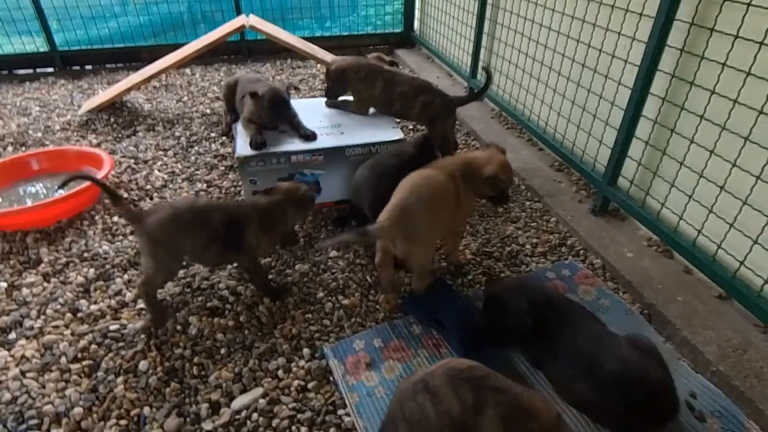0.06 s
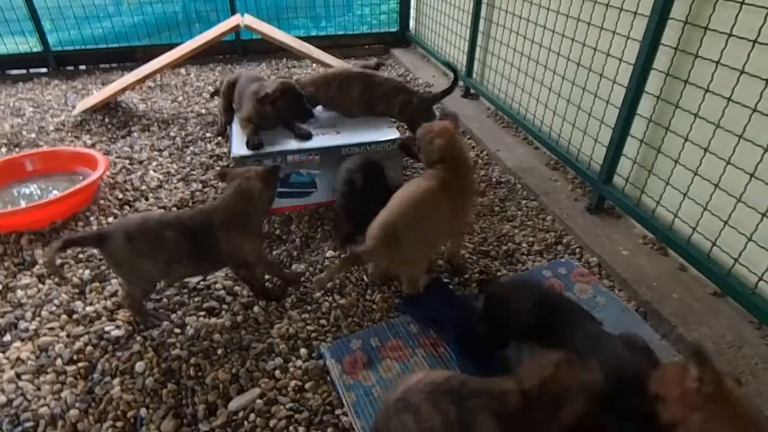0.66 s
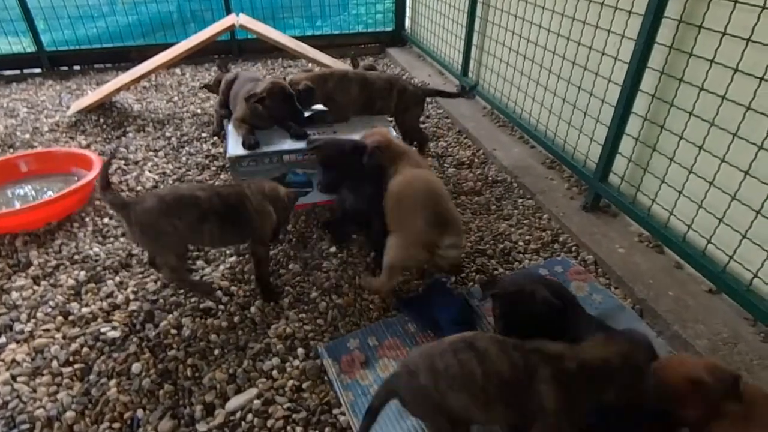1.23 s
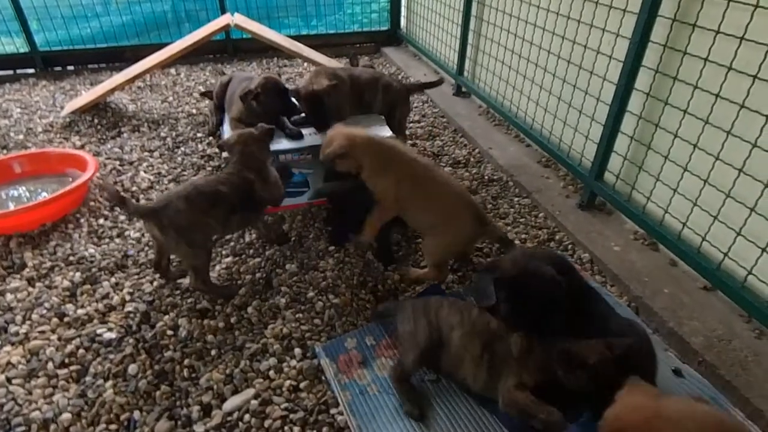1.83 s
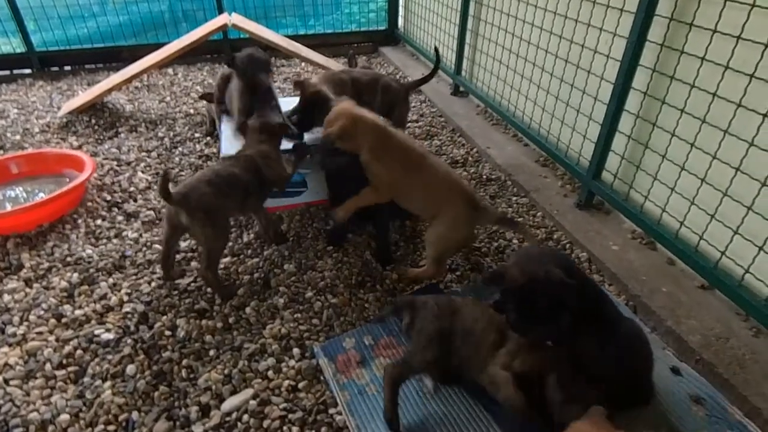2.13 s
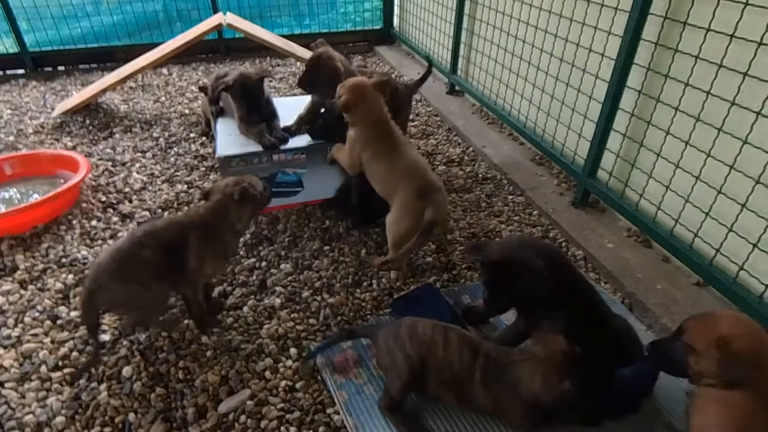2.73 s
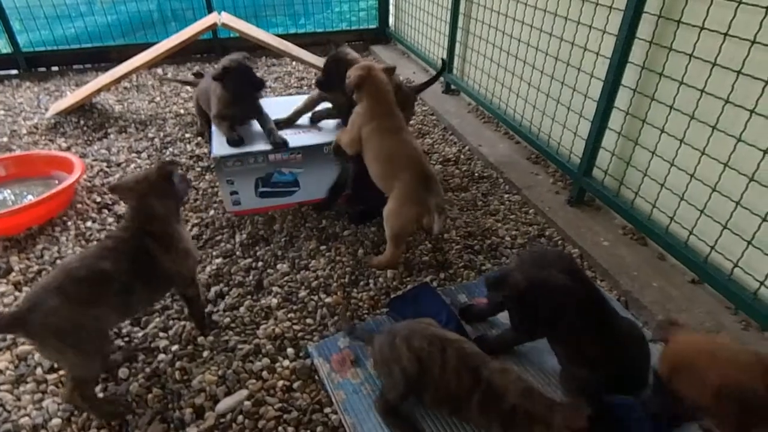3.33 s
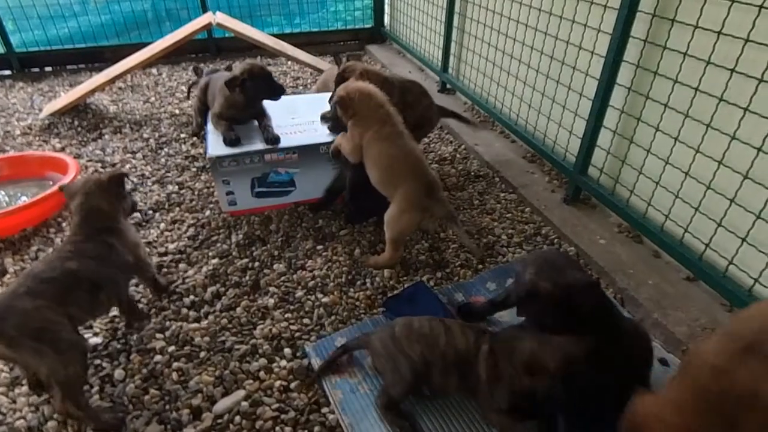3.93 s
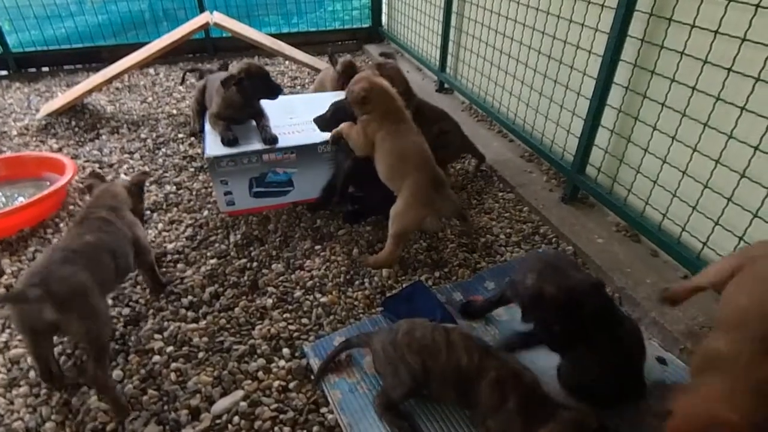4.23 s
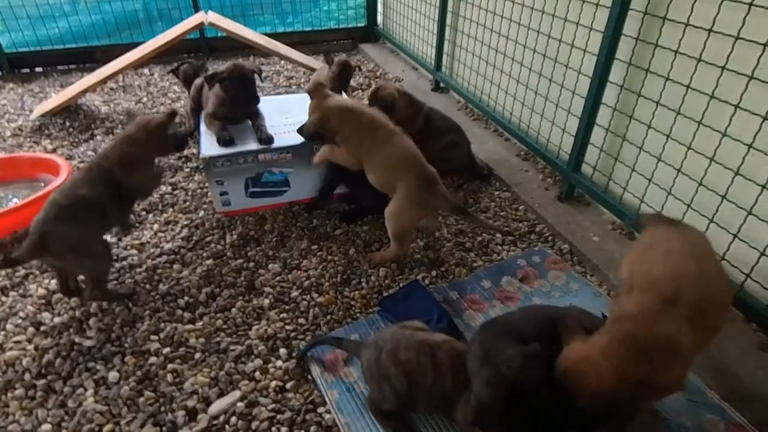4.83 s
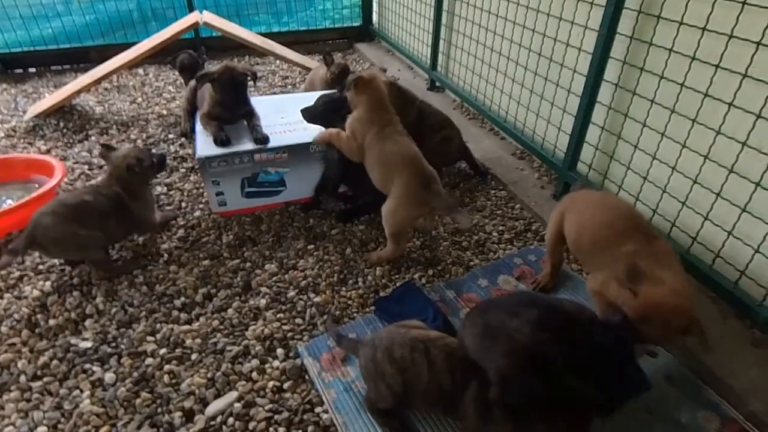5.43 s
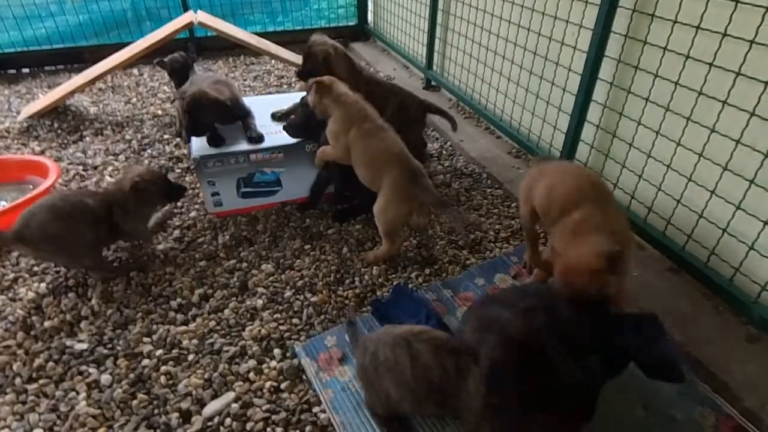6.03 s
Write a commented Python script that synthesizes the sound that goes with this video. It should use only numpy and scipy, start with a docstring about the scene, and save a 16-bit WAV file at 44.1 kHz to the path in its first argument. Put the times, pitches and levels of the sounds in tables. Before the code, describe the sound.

A puppy growls in long rough strokes with a few sharp yips, while paws thump a cardboard box and shuffle gravel.

```python
"""Puppies squabbling over a cardboard box

In a roofed gravel pen, one puppy growls in long rough strokes that open into sharp, snarling yips:
uneven vocal-fold pulses and breath noise drive throat, mouth and teeth resonances.
Paws thump the hollow box and shuffle the pebbles, over a low rumble and quiet outdoor air.
The pen answers briefly; the sound is close and nearly mono."""
import sys
import numpy as np
from scipy import signal
from scipy.fft import rfft, irfft, next_fast_len
from scipy.io import wavfile
from scipy.ndimage import uniform_filter1d, map_coordinates

SR = 44100
rng = np.random.default_rng(int(sys.argv[2]) if len(sys.argv) > 2 else 0)


def inscribe(sig):
    """Save sig as 16-bit PCM at rate SR to the path in sys.argv[1].

    A 1-D sig is mono; a 2-D sig holds one channel per row.
    Samples are clipped to [-1, 1] before scaling.
    """
    pcm = np.round(np.clip(np.atleast_2d(sig).T, -1, 1) * 32767)
    wavfile.write(sys.argv[1], SR, pcm.astype(np.int16))


N = 267731
TIME = np.arange(N) / SR


def amp(db):
    """Decibels to gain."""
    return 10 ** (np.asarray(db) / 20)


def unit(x):
    """Scale to rms 1."""
    return x / np.sqrt(np.mean(x ** 2) + 1e-20)


def along(points, hz):
    """Read (frequency [Hz], value) points on a log axis."""
    point_hz, values = np.transpose(points)
    return np.interp(np.log(hz + 1), np.log(point_hz), values)


def wobble(rate_hz):
    """Smooth random curve, rate_hz knots a second."""
    coarse_s = TIME[::2 ** 5]
    knots = rng.standard_normal(2 ** 12)
    return np.interp(TIME, coarse_s, map_coordinates(knots, [coarse_s * rate_hz], mode="mirror"))


def coloured(x, gain):
    """Minimum-phase filter with magnitude gain(hz)."""
    size = 2 ** 13
    magnitude = np.maximum(gain(np.fft.rfftfreq(size, 1 / SR)), 1e-6)
    cepstrum = irfft(np.log(magnitude), size)
    cepstrum[1:size // 2] *= 2
    cepstrum[size // 2 + 1:] = 0
    return signal.oaconvolve(x, irfft(np.exp(rfft(cepstrum)), size))[:N]


def equalised(x, points):
    """Filter by (frequency [Hz], gain [dB]) points."""
    return coloured(x, lambda hz: amp(along(points, hz)))


def steady(x, window_samples):
    """Even out slow swells, leaving rms near 1."""
    power = uniform_filter1d(uniform_filter1d(x ** 2, window_samples), window_samples)
    return x / np.sqrt(np.abs(power) + 1e-12)


def add(track, time_s, sound):
    """Mix a sound in at time_s."""
    start = max(round(time_s * SR), 0)
    track[start:start + len(sound)] += sound[:max(N - start, 0)]


def pen(x, wet_db):
    """Direct sound, quick scatter off box, bodies and stones, and the walls' tail; power preserved."""
    # (frequency [Hz], t60 [s])
    wall_decay = [(100, 0.76), (500, 0.71), (2000, 0.84), (8000, 0.024)]
    hz, t, noise = signal.stft(rng.standard_normal(SR // 4), SR, nperseg=256)
    scatter = amp(-60 * t / .075)
    walls = amp(-10 - 60 * t / along(wall_decay, hz)[:, None])
    tail = signal.istft(noise * (scatter + walls), SR, nperseg=256)[1]
    tail = np.pad(tail / np.linalg.norm(tail), (SR // 600, 0))
    return (x + amp(wet_db) * signal.oaconvolve(x, tail)[:N]) / np.hypot(1, amp(wet_db))


def background():
    """Uneven low rumble and quiet outdoor air."""
    # rumble contour: (time [s], level [dB])
    rumble_levels = [(0.0, -43.5), (1.45, -43), (1.96, -44), (2.4, -39.5), (3.75, -40.5), (4.01, -42),
                     (6.07, -40)]
    # (frequency [Hz], relative level [dB])
    rumble_spectrum = [(15, -16), (30, -9), (45, 3.5), (70, -2), (140, -2), (220, -12), (500, -31),
                       (1200, -82)]
    # (frequency [Hz], relative level [dB])
    air_spectrum = [(30, -34.5), (150, 1.5), (450, 2), (800, -5), (1500, -14), (3000, -21), (9000, -22.5)]
    swell_db = np.interp(TIME, *np.transpose(rumble_levels)) + 2.16 * wobble(14) - 0.5
    rumble = unit(equalised(rng.standard_normal(N), rumble_spectrum))
    rumble = steady(rumble, window_samples=5000) * amp(swell_db)
    air = unit(equalised(rng.standard_normal(N), air_spectrum))
    return rumble + air * amp(-49.5 + 0.38 * wobble(7.9))


def pebbles(rate_hz, spread_db):
    """Dense patter of stone contacts of unequal size, each ringing for a few cycles."""
    count = int(rate_hz * N / SR)
    t = np.arange(SR // 250) / SR
    when, tone, rank = rng.random((count, 3)).T[:, :, None]
    ring_hz = 2500 + 6500 * tone
    size = amp(-spread_db * np.log(rank + 0.037))
    grains = size * np.sin(2 * np.pi * ring_hz * t) * np.exp(-t * ring_hz / 4.6)
    indices = (when * N).astype(int) + np.arange(len(t))
    return unit(np.bincount(indices.ravel(), grains.ravel(), N)[:N])


def shoves():
    """Envelope of pebble motion: each step builds and settles, over a faint stirring."""
    # paw steps: (hardest push [s], level [dB], settling time [s])
    steps = [(.12, -43.5, 0.044), (0.224, -29, 0.027), (0.311, -35, 0.1), (0.618, -42.5, 0.048),
             (.87, -39, 0.18), (1.048, -40.5, 0.032), (1.128, -36, 0.018), (1.21, -33.5, 0.015),
             (1.377, -34.5, 0.1), (1.56, -39.5, 0.12), (1.782, -40.5, 0.031), (1.938, -48, 0.015),
             (2.069, -45.5, 0.021), (2.159, -40.5, 0.054), (2.32, -39.5, 0.11), (2.478, -40.5, 0.099),
             (2.61, -40, 0.013), (2.7, -35, 0.18), (2.901, -32, 0.1), (3.131, -32, 0.032),
             (3.239, -34, 0.046), (3.448, -43, 0.041), (3.575, -40.5, 0.031), (3.652, -41.5, 0.028),
             (3.771, -39, 0.013), (4.0, -39, 0.029), (4.09, -39.5, 0.021), (4.168, -36, 0.032),
             (4.312, -35, 0.03), (4.389, -37, 0.092), (4.481, -46.5, 0.09), (4.652, -36, 0.057),
             (4.85, -35.5, 0.025), (4.91, -35, 0.043), (5.269, -33, 0.055), (5.42, -41.5, 0.028),
             (5.578, -40.5, 0.038), (5.678, -41.5, 0.037), (5.759, -45.5, 0.01)]
    stir_db, rise_share = -64, 0.8
    power = np.full(N, amp(stir_db) ** 2)
    for time_s, db, settle_s in steps:
        start, end = np.searchsorted(TIME, [time_s - 10 * settle_s, time_s + 10 * settle_s])
        t = TIME[start:end] - time_s
        from_peak = np.maximum(t, -t / rise_share) / settle_s
        power[start:end] += amp(db) ** 2 * np.exp(-2 * from_peak ** 1.04)
    return np.sqrt(power)


def clacks():
    """Kicked pebbles strike together and settle: noise bursts with a fast and a slow decay."""
    # (time [s], level [dB])
    kicks = [(0.1573, -34.5), (0.868, -24), (0.9122, -23.5), (1.175, -29.5), (1.6574, -28), (1.7225, -32.5),
             (1.854, -41.5), (3.1343, -12.5), (3.5636, -25), (4.2426, -33.5), (4.375, -22.5),
             (4.4489, -25.5), (4.827, -30), (5.0736, -38), (5.1361, -32.5), (5.223, -23.5), (5.5014, -39)]
    # (frequency [Hz], gain [dB])
    clack_colour = [(300, 0.5), (1500, -11), (3000, -8), (5000, 3), (9000, 3)]
    out, t = np.zeros(N), np.arange(SR // 10) / SR
    strike = (amp(-60 * t / .025) + amp(-8 - 60 * t / .12)) * (1 - np.exp(-t / .0012))
    for time_s, db in kicks:
        add(out, time_s, amp(db - 3.5) * strike * rng.standard_normal(len(t)))
    return equalised(out, clack_colour)


def gravel():
    """Paws shift and kick the pebbles; only the treble of the reflections has stereo width."""
    # (frequency [Hz], relative level [dB])
    stone_spectrum = [(700, -34.5), (1800, -11), (3000, -14.5), (4200, -8.5), (5500, -3.5), (7000, -1),
                      (9000, 1.5)]
    # stereo side signal: (frequency [Hz], gain [dB])
    side_colour = [(1500, -60), (2400, -40.5), (4200, -7), (6000, -7.5), (8000, -31.5)]
    grains = pebbles(rate_hz=2200, spread_db=4) + amp(-2) * rng.standard_normal(N)
    patter = steady(unit(equalised(grains, stone_spectrum)), window_samples=2600)
    stones = patter * shoves() + clacks()
    side = equalised(pen(stones, wet_db=26), side_colour)
    mid = pen(stones, wet_db=-8)
    return np.array([mid + side, mid - side])


def gesture(calls):
    """Calls swell, hold and fade as pitch glides. Returns throat, mouth, teeth gains and voice controls."""
    onset_s, release_s = .01, .062
    edge_db, jaw_gain_db, tremor_db = 11, 3.5, 1.2
    sag_per_db = .05  # pitch sinks as a call fades
    gains, controls = np.zeros((3, N)), np.zeros((6, N))
    for k, call in enumerate(calls):
        time_s, length_s, swell_s, fade_s, throat_db, mouth_db, teeth_db = call[:7]
        first_hz, middle_hz, last_hz, rough, subpulse, throat_hz, mouth_hz = call[7:]
        span_s = [time_s - onset_s if k else 0, time_s + length_s + 10 * release_s]
        start, end = np.searchsorted(TIME, span_s)
        t = TIME[start:end] - time_s
        progress = np.clip(t / length_s, 0, 1)
        arch = np.sin(np.pi * progress)
        fade_db = -edge_db * np.clip(1 - (length_s - t) / fade_s, 0, 1)
        effort_db = fade_db - edge_db * np.clip(1 - t / swell_s, 0, 1)
        gape_db = jaw_gain_db * (arch - 1)  # jaws widest in mid-call
        gate = np.clip(t / onset_s + 1, 0, 1) * np.exp(-np.maximum(t - length_s, 0) / release_s)
        # upper resonances follow effort more steeply
        parts_db = [effort_db, mouth_db + gape_db + 1.29 * effort_db, teeth_db + gape_db + 2 * effort_db]
        gains[:, start:end] += gate * amp(throat_db) * amp(parts_db)
        bow_hz = middle_hz - (first_hz + last_hz) / 2
        glide_hz = first_hz + (last_hz - first_hz) * progress + bow_hz * arch
        pitch_hz = glide_hz * np.exp(sag_per_db * fade_db)
        for control, value in zip(controls, [pitch_hz, rough, subpulse, throat_hz, mouth_hz, progress]):
            control[start:end] = value
            control[end:] = control[end - 1]  # held until the next call
    return gains * amp(tremor_db * wobble(28)), controls


def folds(pitch_hz, rough, subpulse, jitter, scatter_db, rasp):
    """Uneven fold closures, a weaker one between, each with a turbulent puff; one source per rasp value."""
    puff_s = .0019
    rough = np.clip(rough * np.exp(.25 * wobble(18)), 0, 1)  # slips between clear and hoarse
    wavering_hz = pitch_hz * np.exp(.028 * rough * wobble(35))
    cycles = np.cumsum(wavering_hz * np.exp(jitter * rough ** 2 * wobble(110))) / SR
    half_cycle = np.floor(2 * cycles)
    size = np.where(half_cycle % 2, np.clip(subpulse, 0, 1), 1) * amp(scatter_db * rough * wobble(130))
    pulses = np.diff(half_cycle, prepend=0) * size
    puffs = signal.lfilter([1], [1, -np.exp(-1 / (puff_s * SR))], pulses) * rng.standard_normal(N)
    noise_shares = [1 - np.exp(-amount * rough) for amount in rasp]
    return [np.sqrt(1 - share) * unit(pulses) + np.sqrt(share) * unit(puffs) for share in noise_shares]


def resonate(x, hz, gain_db, width_hz):
    """Add a gliding resonance to x: shift its centre to zero, smooth, shift back."""
    carrier = np.exp(2j * np.pi * np.cumsum(hz) / SR)
    pole = np.exp(-np.pi * width_hz / SR)
    baseband = signal.lfilter([1 - pole], [1, -pole], x / carrier)
    return x + amp(gain_db) * 2 * (carrier * baseband).real


def closing(mouth_hz, progress, octaves):
    """The mouth resonance falls through a call as the lips close."""
    return mouth_hz * 2 ** (octaves * (.5 - progress))


def voice(gains, tract, sources, wet_db):
    """Fold sources drive the tract's throat, mouth and teeth bands, coloured by the pen."""
    # standing waves: (frequency [Hz], width [Hz], gain [dB])
    pen_modes = [(305.6, 30, 11), (508.5, 4.9, 15.5), (1186, 24, -3.5), (1950, 16, -14.5), (2605.3, 13, -3)]

    def standing_db(hz):
        return sum(db / (1 + (2 * (hz - mode_hz) / width_hz) ** 2) for mode_hz, width_hz, db in pen_modes)

    def below(hz, edge_hz):
        return 1 / np.sqrt(1 + (hz / edge_hz) ** 20)

    bands = [lambda hz: below(hz, 707),
             lambda hz: (1 - below(hz, 721)) * below(hz, 1890),
             lambda hz: 1 - below(hz, 1760)]
    out = np.zeros(N)
    for source, band, gain in zip(sources, bands, gains):
        resonant = coloured(source, lambda hz: band(hz) * amp(along(tract, hz) + standing_db(hz)))
        # reflections fill the gaps between pulses
        out += gain * steady(pen(resonant, wet_db), window_samples=1100)
    return out


def yips():
    """Short harsh outbursts through a wide-open mouth, lingering in the pen."""
    # (start [s], length [s], swell [s], fade [s], throat [dB], mouth, teeth [dB re throat],
    #  start, middle, end pitch before sag [Hz], roughness [0-1], in-between pulse [0-1],
    #  throat resonance [Hz], mid-call mouth resonance [Hz])
    calls = [(.16, 0.1, .005, 0.066, -59, 12.5, 12, 162, 159.2, 157.5, 0.87, .1, 388, 1410),
             (2.262, 0.15, 0.034, .05, -28, 0.5, -4, 102.3, 96.47, 88.2, .45, 0.92, 446, 1176),
             (3.163, .16, 0.0077, .06, -30.5, 2.5, 0, 113.5, 120.3, 117.5, .55, 0.44, 343, 1650),
             (5.985, .11, 0.022, .02, -28, 5, -3.5, 133, 143.7, 142.8, .6, 0.91, 589.6, 1243)]
    # vocal tract, jaws wide: (frequency [Hz], gain [dB])
    open_tract = [(90, -30), (210, 0), (370, 6), (560, 1.5), (720, 0), (1120, 2.5), (1500, 0), (1900, 2),
                  (2250, -2.5), (2700, -3.5), (3300, -10), (3900, -12.5), (6000, -29.5), (9000, -74.5)]
    gains, (pitch_hz, rough, subpulse, throat_hz, mouth_hz, progress) = gesture(calls)
    throat, mouth, teeth = folds(pitch_hz, rough, subpulse, jitter=.25, scatter_db=7, rasp=[.7, 2.1, 3.8])
    throat = resonate(throat, throat_hz, gain_db=1, width_hz=300)
    mouth = resonate(mouth, closing(mouth_hz, progress, octaves=.6), gain_db=1.5, width_hz=140)
    return pen(voice(gains, open_tract, [throat, mouth, teeth], wet_db=-1), wet_db=-13.5)


def growls():
    """Long rough strokes of the folds through nearly shut jaws."""
    # columns as in yips()
    calls = [(.31, .555, 0.014, 0.22, -35, -9.5, -23.5, 152, 149.1, 134.2, 0.68, .55, 325, 1370),
             (1.175, 0.52, 0.016, 0.26, -34.5, -11.5, -21, 151.9, 145.6, 133.9, 0.7, 0.49, 350, 930),
             (2.055, 0.14, 0.056, 0.022, -35, -13, -15.5, 104.7, 99.57, 95, 0.32, 0.28, 410, 1450),
             (2.19, .228, 0.055, .012, -29.5, -14.5, -17.5, 110.3, 98.74, 81.6, 0.16, .55, 388, 1490),
             (2.77, 0.28, 0.0043, .13, -31, -9, -16.5, 170.8, 157.7, 158.4, .45, 0.5, 336, 1117),
             (3.05, .11, 0.0072, .02, -43, -7.5, -8.5, 129.4, 124.8, 119, 0.71, 0, 400, 1200),
             (3.388, .19, 0.0052, .17, -38, -7.5, -8, 130.1, 138, 137.2, 0.89, 0.77, 430.3, 1100),
             (3.625, .4, 0.027, .045, -33, -8, -14, 148.7, 164.3, 146.8, .36, 0.66, 315, 1224),
             (4.37, 0.47, .1, .11, -37, -17, -24, 127.1, 129.2, 118.9, .56, .5, 221, 1322),
             (5.13, 0.43, .13, 0.17, -36, -14, -26, 120.5, 137.3, 119.5, 0.62, 0.62, 640, 1130),
             (5.66, 0.36, 0.13, 0.04, -44.5, -24, -37, 129, 124.9, 122, 0.027, .2, 629.3, 1485)]
    # vocal tract, jaws nearly shut: (frequency [Hz], gain [dB])
    shut_tract = [(70, -22), (140, 2.5), (220, -2), (320, -5), (410, 2.5), (540, -0.5), (620, -6),
                  (740, -11.5), (950, -11), (1300, -15), (1600, -21), (2200, -28), (2950, -20.5),
                  (3600, -29), (6000, -38)]
    gains, (pitch_hz, rough, subpulse, throat_hz, mouth_hz, progress) = gesture(calls)
    throat, mouth, teeth = folds(pitch_hz, rough, subpulse, jitter=.24, scatter_db=7, rasp=[.5, 1.4, 4])
    throat = resonate(throat, throat_hz, gain_db=-5, width_hz=180)
    mouth = resonate(mouth, closing(mouth_hz, progress, octaves=.16), gain_db=3, width_hz=110)
    return voice(gains, shut_tract, [throat, mouth, teeth], wet_db=-4)


def box():
    """Paws set the lid booming on the air inside and knock the stiffer panels; hard contacts click."""
    # (time [s], level [dB], boom [Hz], boom t60 [s], knock gain [dB], contact time [s])
    thumps = [(0.869, -24.5, 92.45, 0.19, 3.5, 0.0029), (1.022, -26.5, 62, 0.16, -21, 0.0033),
              (1.204, -26, 148, 0.28, 5.5, 0.00014), (1.263, -20.5, 91.3, 0.28, -6, 0.0021),
              (1.653, -32, 79.3, 0.24, -2, 0.00022), (1.856, -38, 88.1, 0.074, 7.5, 0.00052),
              (2.452, -12.5, 135, 0.14, 0, 0.0015), (2.47, -5, 142.3, 0.12, -2.5, 0.0037),
              (2.515, -20, 137, 0.12, 3, 0.0018), (2.59, -27.5, 88.4, 0.38, 1, 0.0022),
              (2.742, -5.5, 111, 0.1, -3, 0.00097), (2.814, -13.5, 86.5, 0.21, -17, 0.0093),
              (3.388, -28, 93, 0.071, -9.5, 0.00021), (3.427, -20.5, 57, 0.37, -17, 0.0055),
              (3.446, -25, 120.4, 0.11, 11.5, 0.0024), (3.454, -12.5, 119, .1, 6, 0.0099),
              (4.889, -22.5, 62.14, 0.17, -25, 0.00408), (5.073, -27.5, 59.9, .2, -10, 0.00057),
              (5.192, -26, 130, 0.2, -14, 0.0032), (5.498, -23.5, 135, 0.087, -24, .002),
              (5.653, -26.5, 85, 0.18, 1.5, .004), (5.943, -4, 86.7, 0.23, -8, 0.0072)]
    # cardboard modes: (frequency [Hz], level [dB], t60 [s])
    panels = [(168, 0.5, 0.1), (248, -9, 0.14), (316.3, -6.5, 0.19), (421, 0.5, 0.042), (483, -0.5, 0.042),
              (580, -5.5, 0.022), (1080, -11.5, 0.016), (1670, -7.5, 0.015)]
    # little sounds below the boom: (frequency [Hz], gain [dB])
    box_colour = [(20, -24), (60, -0.5), (1800, 4), (5000, -11)]
    out, t = np.zeros(N), np.arange(SR // 2) / SR
    mode_hz, mode_db, mode_t60_s = np.transpose(panels)[:, :, None]
    for time_s, db, boom_hz, boom_t60_s, knock_db, contact_s in thumps:
        level_draw, tuning_draw = rng.standard_normal((2, len(panels), 1))
        boom = np.sin(2 * np.pi * boom_hz * t) * amp(-60 * t / boom_t60_s) * (1 - np.exp(-t / .0016))
        ring_hz = mode_hz * (1 + .087 * tuning_draw)
        ring_db = mode_db + 2 * level_draw - 60 * t / mode_t60_s
        knock = np.sum(amp(ring_db) * np.sin(2 * np.pi * ring_hz * t), axis=0)
        claws = amp(-14 - 60 * t / .08) * rng.standard_normal(len(t)) / (1 + (contact_s / .001) ** 2)
        impact = (knock + claws) * (1 - np.exp(-t / contact_s))
        add(out, time_s, amp(db) * (boom + amp(knock_db - 9) * impact))
    return pen(equalised(out, box_colour), wet_db=-8)


def scene():
    """Stereo mix; the walls give the voice a little treble width."""
    # stereo side signal: (frequency [Hz], gain [dB])
    side_colour = [(1700, -71), (2600, -59.5), (3600, -2.5), (6000, -21.5)]
    puppy = growls() + yips()
    side = equalised(pen(puppy, wet_db=29.5), side_colour)
    return np.array([puppy + side, puppy - side]) + box() + gravel() + background()


def record(dry):
    """The microphone rolls off the top treble and passes nothing above its band limit."""
    # (frequency [Hz], gain [dB])
    microphone = [(7200, 2), (7900, -4), (8500, -12.5), (9100, -23.5), (9500, -32.5)]
    limit_hz = 9500
    size = next_fast_len(N + SR // 4)
    hz = np.fft.rfftfreq(size, 1 / SR)
    response = amp(along(microphone, hz)) * (hz < limit_hz)
    return irfft(rfft(dry, size) * response, size)[..., :N]


dry = scene()
out = record(dry)
inscribe(out)
```